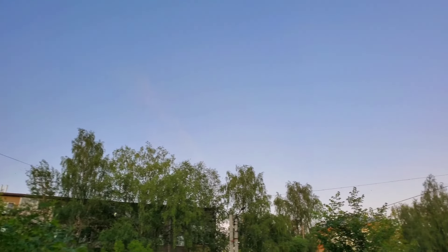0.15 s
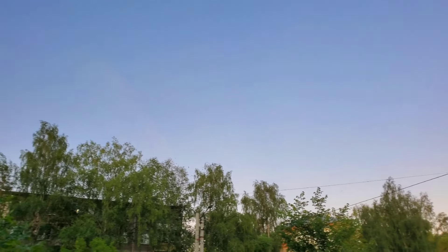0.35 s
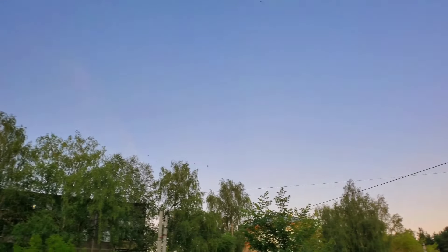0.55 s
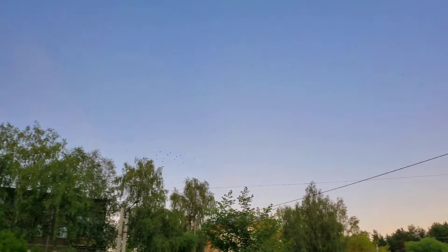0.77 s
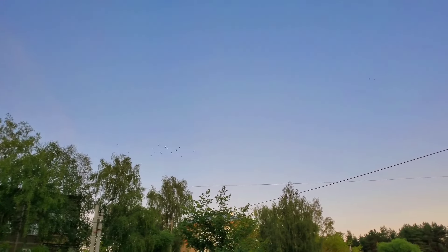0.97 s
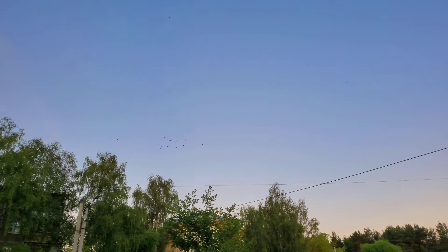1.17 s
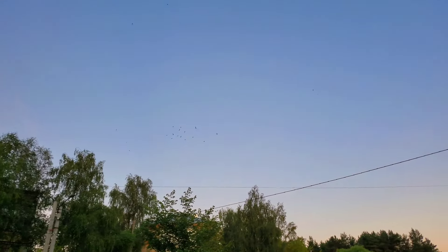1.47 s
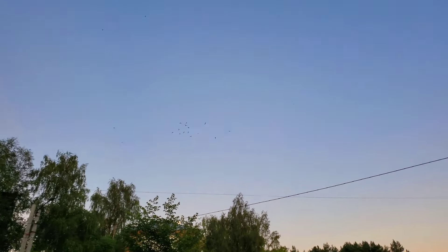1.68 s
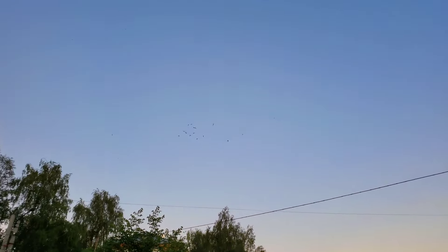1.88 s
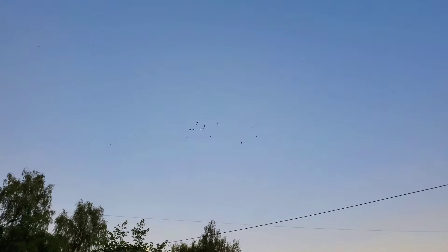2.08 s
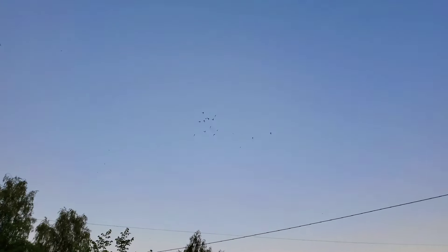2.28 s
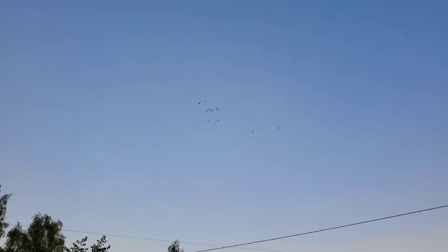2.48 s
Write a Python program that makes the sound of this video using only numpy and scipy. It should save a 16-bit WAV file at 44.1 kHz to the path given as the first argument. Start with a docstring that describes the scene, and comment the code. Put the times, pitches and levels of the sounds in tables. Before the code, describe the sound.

A flock of swifts gives high, buzzing screams outdoors above a low, distant rumble.

```python
"""Swifts scream high over trees and houses on a calm evening.
Each scream swoops up to a shrill arch, buzzing fast; most break into a slow stutter as they sink.
The shrill note is the voice's second harmonic. Trees and walls scatter the calls.
Behind them: the far flock's shimmer, distant traffic rumble, engine hums, light wind, a high hiss."""
import sys
import numpy as np
from scipy import signal
from scipy.fft import rfft, irfft, next_fast_len
from scipy.io import wavfile

SR = 44100
rng = np.random.default_rng(int(sys.argv[2]) if len(sys.argv) > 2 else 0)


def file_out(sig):
    """Save sig as 16-bit WAV at sys.argv[1]."""
    # one column per channel
    cols = np.atleast_2d(sig).T
    # limit, then scale
    lim = np.clip(cols, -1, 1)
    pcm = np.round(lim * 32767).astype(np.int16)
    wavfile.write(sys.argv[1], SR, pcm)


N = 116424
T = np.arange(N) / SR

# Near screams: start_s, length_s, top_hz, swoop_hz, crest_s, arch_hz_per_s2, level_db,
# overtones_db, stutter_s, stutter_hz, left_minus_right_db (crest_s, stutter_s count from start_s)
SCREAMS = [ (-.15, 0.33, 6100, 510, 0.22, 14000, -51.5, -17, 0.52, 67, 10),
           (-.1, 0.4, 4690, 302, 0.12, 5980, -50, -12, 0.2, 57, 1),
           (0.187, 0.56, 6230, 241, 0.26, 21200, -40.5, -10, 0.19, 71, -2.5),
           (.2, 0.12, 5915, 153, .07, 24900, -40, -19, .11, 70, 2),
           (0.222, 0.39, 5220, 200, .28, 7000, -39.5, -3.5, 0.257, 36.4, -1.5),
           (0.608, 0.18, 5900, 510.5, 0.097, 34200, -43, -12, .12, 27.5, -0.5),
           (0.741, 0.14, 5684, 47, 0.088, 8000, -46.5, -7, .1, 59, 1),
           (0.788, 0.21, 5180, 150, 0.13, 15000, -51.5, -9, 0.23, 30, 6),
           (0.934, 0.325, 6137, 702, 0.15, 14940, -33.5, -1, 0.24, 72, -2.5),
           (0.931, 0.2, 5860, 704, 0.17, 22670, -37, -19, 0.11, 58, -2),
           (1.289, 0.26, 5882, 599, 0.16, 19980, -36, -3.5, 0.19, 32, -2),
           (1.357, 0.65, 6935, 733, 0.22, 11130, -30, -0.5, 0.25, 50, 1),
           (1.611, 0.41, 6138, 956, 0.15, 12500, -33, 1.5, .217, 76, 0),
           (1.912, 0.25, 6090, 557, 0.12, 36070, -30.5, -5.5, 0.166, 31.7, -3),
           (2.218, 0.39, 6045, 907.5, 0.15, 16120, -33, -10.5, .25, 49, 1.5),
           (2.37, 0.089, 5900, 0, 0, 42300, -34, -3, .1, 50, 1),
           (2.25, 0.31, 6030, 697, 0.14, 15010, -30.5, 0.5, 0.3, 66, -2.5),
           (2.546, .33, 6050, 853, 0.15, 16170, -24.5, -11.5, .25, 55, 1)]
# Voice harmonics 3, 4, 5: relative_db
OVERTONES_DB = [-20.5, -18, -33]
# Single pulses jumping out of the stutter: time_s, pitch_hz, level_db
CHIPS = [(.505, 5450, -38), (.56, 5950, -39), (.565, 4560, -38.5), (1.139, 6910, -35), (1.157, 6840, -36),
         (1.18, 6800, -38), (1.206, 5930, -31), (1.22, 5870, -34), (1.25, 4770, -42), (1.505, 5680, -34),
         (1.54, 5710, -38), (1.573, 4260, -47), (1.75, 6560, -28), (1.775, 6710, -30), (1.801, 6600, -27),
         (1.895, 4980, -43), (2.113, 5850, -36), (2.18, 4410, -42.5)]
# Far flock envelope: time_s, level_db
FLOCK_LEVEL = [(0, -40.5), (.2, -44.5), (.45, -37), (.68, -41.5), (.9, -56.5), (1.1, -33.5), (1.3, -42.5),
               (1.75, -39.5), (2.05, -39), (2.2, -53), (2.4, -39.5), (2.64, -40)]
# Far flock spectrum: freq_hz, gain_db
FLOCK_SPECTRUM = [(3500, -23.5), (4500, -14), (5200, -2), (5900, 11), (6400, 1.5), (7100, -22), (9000, -18),
                  (11800, -15.5), (13500, -58)]
# Traffic envelope: time_s, level_db
RUMBLE_LEVEL = [(0, -31.5), (.3, -34), (.5, -32.5), (.9, -34.5), (1.1, -33.5), (1.55, -33), (1.75, -31),
                (1.95, -34), (2.35, -34), (2.64, -34.5)]
# Traffic spectrum: freq_hz, gain_db
RUMBLE_SPECTRUM = [(15, -13), (25, -41), (36, -10), (50, 4), (65, -6), (90, 1), (125, -3.5), (160, -10.5),
                   (210, -14), (280, -19.5), (400, -20.5), (520, -24.5), (700, -22.5), (1000, -33),
                   (1600, -67)]
# Distant engines: start_s, length_s, pitch_hz, level_db
HUMS = [(-0.19, 1.6, 91.5, -38.5), (1.236, 0.69, 95, -36.5), (1.573, 1.08, 80.7, -33),
        (0.467, 0.76, 367, -51.5), (1.283, 0.63, 239, -47.5), (-.2, 1.28, 655, -59.5),
        (0.97, 1.9, 653, -54.5)]
# Breeze envelope: time_s, level_db
BREEZE_LEVEL = [(0.0, -52), (0.41, -55), (0.53, -48), (0.88, -54.5), (1.27, -55.5), (1.68, -47),
                (2.21, -56), (2.31, -52), (2.64, -54.5)]
# Breeze spectrum: freq_hz, gain_db
BREEZE_SPECTRUM = [(300, -18.5), (700, -2), (1050, -3.5), (1500, 1.5), (2100, -6.5), (3000, -9.5),
                   (3800, -16), (6000, -22), (9000, -55)]
# Hiss spectrum: freq_hz, gain_db
HISS_SPECTRUM = [(3000, -63), (6000, -22), (7300, -7.5), (8400, 3.5), (10500, -7), (12000, -19),
                 (13500, -10), (15400, -22)]
# Left-right likeness of the noise beds: freq_hz, correlation
STEREO_CORRELATION = [(60, 0.93), (130, 0.93), (280, 0.87), (600, 0.32), (1300, -0.28), (2600, 0.095),
                      (9000, -0.58)]
# Left microphone response: freq_hz, gain_db
LEFT_MIC = [(60, -1.5), (400, -1.5), (1500, 0), (4000, -2), (7000, -3), (7450, 0.5), (8000, 3.5), (9000, 3),
            (12000, 4.5), (13000, 1.5), (15000, -8.5)]
# Right microphone response: freq_hz, gain_db
RIGHT_MIC = [(60, -0.5), (400, 3.5), (1500, 2.5), (4000, 0), (7000, -2.5), (7450, 3), (7900, -22),
             (8700, -12.5), (12000, -5), (13000, -11), (15000, -17)]

ATTACK_S, RELEASE_S, FADE_DB_PER_S = 0.0056, 0.032, 80
SWOOP_S, SWOOP_QUIET_DB, SWELL_S = 0.023, 13, 0.018
BUZZ_HZ, BUZZ_SLOWING_PER_S, BUZZ_DEPTH, BUZZ_SWING_HZ = 252, 1, 0.49, -27
STUTTER_SWING_HZ, JITTER_HZ, WAVER_HZ, FLUTTER_DB = 48, 21.5, 31.9, 1
RASP_DB, RASP_WIDTH_HZ, RASP_BELOW_HZ = -15.5, 700, 150
OVERTONE_RASP_DB, OVERTONE_FLUTTER_DB, THIRD_FADE_DB_PER_S = -4.5, 1.85, 58


def amp(db):
    """Decibels to gain."""
    return 10 ** (np.asarray(db) / 20)


def unit_rms(x):
    """Scale to rms 1."""
    return x / np.sqrt(np.mean(np.abs(x) ** 2) + 1e-20)


def log_interp(rows, hz):
    """Interpolate (freq_hz, value) rows on a log axis."""
    freq_hz, values = np.transpose(rows)
    return np.interp(np.log(hz + 1), np.log(freq_hz + 1), values)


def gain_curve(rows):
    """Gain per sample from (time_s, level_db) rows."""
    return amp(np.interp(T, *np.transpose(rows)))


def ramp(u):
    """Smooth step from 0 to 1."""
    return np.sin(np.pi / 2 * np.clip(u, 0, 1)) ** 2


def wobble(knots_per_s, t):
    """Smooth random curve, rms about 1."""
    curve = signal.resample_poly(rng.standard_normal(1024), 4, 1)
    return np.interp(t * knots_per_s * 4, np.arange(len(curve)), curve)


def phase_rad(hz):
    """Running phase of a frequency curve, random start."""
    return 2 * np.pi * (np.cumsum(hz) / SR + rng.random())


def filtered(x, response):
    """Apply a frequency response by FFT."""
    size = next_fast_len(N + SR // 2)
    return irfft(rfft(x, size) * response(np.fft.rfftfreq(size, 1 / SR)), size)[..., :N]


def stereo_noise(spectrum):
    """Shaped noise of rms 1, nearly mono in the bass."""
    def mid_side_gains(hz):
        angle = np.arccos(np.clip(log_interp(STEREO_CORRELATION, hz), -1, 1)) / 2
        return amp(log_interp(spectrum, hz)) * [np.cos(angle), np.sin(angle)]
    mid, side = filtered(rng.standard_normal((2, N)), mid_side_gains)
    return unit_rms(np.array([mid + side, mid - side]))


def add(out, start_s, sound):
    """Mix a stereo sound in at start_s."""
    at = round(start_s * SR)
    part = sound[:, max(-at, 0):N - at]
    out[:, max(at, 0):][:, :part.shape[1]] += part


def scream(t, length_s, top_hz, swoop_hz, crest_s, arch_hz_per_s2, overtones_db, stutter_s, stutter_hz):
    """Arched whistle with a rasp just under it, chopped by a fast buzz, then a fading stutter."""
    buzz_hz = BUZZ_HZ * np.exp(-BUZZ_SLOWING_PER_S * t) * (1 + 0.0775 * wobble(60.6, t))
    buzz = np.sin(phase_rad(buzz_hz))
    into_stutter_s = t - stutter_s
    stutter = np.cos(2 * np.pi * stutter_hz * into_stutter_s + 0.068 * wobble(31, t))
    stutter *= ramp(into_stutter_s / 0.011 + 0.5)
    pitch_hz = top_hz - swoop_hz * np.exp(-t / SWOOP_S) - arch_hz_per_s2 * (t - crest_s) ** 2
    pitch_hz += BUZZ_SWING_HZ * buzz + STUTTER_SWING_HZ * stutter
    pitch_hz += JITTER_HZ * wobble(900, t) + WAVER_HZ * wobble(29, t)
    fundamental_rad = phase_rad(pitch_hz / 2)
    rasp = amp(RASP_DB) * roughness(t) * np.exp(-2j * np.pi * RASP_BELOW_HZ * t)
    whistle = np.real((1 + rasp) * np.exp(2j * fundamental_rad)) * amp(FLUTTER_DB * wobble(21.6, t))
    pulse = 1 + BUZZ_DEPTH * buzz
    voice = pulse * whistle + amp(overtones_db) * pulse ** 2 * overtones(fundamental_rad, t)
    gate = ramp(t / ATTACK_S) * ramp((length_s - t) / RELEASE_S)
    swell_db = -SWOOP_QUIET_DB * np.exp(-t / SWELL_S)
    fade_db = -FADE_DB_PER_S * np.maximum(into_stutter_s, 0)
    return voice * gate * amp(swell_db + fade_db) * (1 + stutter)


def roughness(t):
    """Complex narrowband noise that spreads a harmonic into a rasp."""
    return wobble(RASP_WIDTH_HZ, t) + 1j * wobble(RASP_WIDTH_HZ, t)


def overtones(fundamental_rad, t):
    """Rough, flickering harmonics above the shrill note; the third flares at the onset."""
    out = 0
    for harmonic, db in enumerate(OVERTONES_DB, 3):
        fade_db = -THIRD_FADE_DB_PER_S * t if harmonic == 3 else 0
        gain = amp(db + fade_db + OVERTONE_FLUTTER_DB * wobble(36.4, t))
        rough = 1 + amp(OVERTONE_RASP_DB) * roughness(t)
        out += gain * np.real(rough * np.exp(1j * harmonic * fundamental_rad))
    return out


def chip(t, pitch_hz, half_width_s=0.0045, jitter_hz=112, overtones_db=3.5):
    """One Gaussian pulse of the voice, centred on t = 0."""
    age_s = t - t[0]
    fundamental_rad = phase_rad((pitch_hz + jitter_hz * wobble(722, age_s)) / 2)
    voice = np.sin(2 * fundamental_rad) + amp(overtones_db) * overtones(fundamental_rad, age_s)
    return np.exp(-(t / half_width_s) ** 2) * voice


def outdoors(call, t60_s=0.39, scatter_db=-4.5, reflections=8, reflections_db=-6):
    """Direct sound, ground and wall reflections, and scatter from the trees."""
    t = T[:SR // 2]
    scatter = rng.standard_normal((2, len(t))) * amp(-60 * t / t60_s) * ramp(t / 0.0045)
    impulse = amp(scatter_db) * unit_rms(scatter) / np.sqrt(len(t))
    impulse[:, 0] += 1
    for channel in impulse:
        taps = (SR * rng.uniform(0.0005, 0.02, reflections)).astype(int)
        strengths = unit_rms(rng.standard_normal(reflections)) / np.sqrt(reflections)
        channel[taps] += amp(reflections_db) * strengths
    return signal.fftconvolve(call[None], impulse, axes=1)[:, :N]


def near_swifts(mic_lag_s=0.00004):
    """Screams and chips, reaching the right microphone first."""
    out = np.zeros((2, N))
    for start_s, length_s, *contour, db, overtones_db, stutter_s, stutter_hz, pan_db in SCREAMS:
        call = scream(T[T < length_s], length_s, *contour, overtones_db, stutter_s, stutter_hz)
        pan = amp([[pan_db / 2], [-pan_db / 2]])
        add(out, start_s, amp(db) * pan * outdoors(call))
    t = np.arange(-0.015, 0.015, 1 / SR)
    for time_s, pitch_hz, db in CHIPS:
        add(out, time_s + t[0], amp(db) * outdoors(chip(t, pitch_hz)))
    delay_s = np.array([[mic_lag_s / 2], [-mic_lag_s / 2]])
    return filtered(out, lambda hz: np.exp(-2j * np.pi * hz * delay_s))


def far_flock(shimmer_db=2.6):
    """The rest of the flock, blurred by distance into a shrill shimmer."""
    shimmer = amp(shimmer_db * wobble(120, T))
    return gain_curve(FLOCK_LEVEL) * shimmer * stereo_noise(FLOCK_SPECTRUM)


def engine_hums(fade_s=0.11, drift_ratio=0.00614):
    """Distant engines: sines drifting in level and pitch."""
    out = np.zeros(N)
    for start_s, length_s, pitch_hz, db in HUMS:
        peak = np.sqrt(2) * amp(db + wobble(6.14, T))
        tone = np.sin(phase_rad(pitch_hz * (1 + drift_ratio * wobble(8, T))))
        gate = ramp((T - start_s) / fade_s) * ramp((start_s + length_s - T) / fade_s)
        out += peak * tone * gate
    return out


def traffic_rumble():
    """Low noise of far traffic."""
    return gain_curve(RUMBLE_LEVEL) * stereo_noise(RUMBLE_SPECTRUM)


def breeze(boost_db=4.5):
    """Light wind swelling in the trees."""
    return amp(boost_db) * gain_curve(BREEZE_LEVEL) * stereo_noise(BREEZE_SPECTRUM)


def hiss(level_db=-58):
    """Steady high hiss."""
    return amp(level_db) * stereo_noise(HISS_SPECTRUM)


def scene():
    """Birds above, traffic and breeze below."""
    return near_swifts() + far_flock() + engine_hums() + traffic_rumble() + breeze() + hiss()


def record(dry, cutoff_hz=15400):
    """Two band-limited microphones, the right one duller."""
    def response(hz):
        return amp([log_interp(LEFT_MIC, hz), log_interp(RIGHT_MIC, hz)]) * (hz < cutoff_hz)
    return filtered(dry, response)


dry = scene()
out = record(dry)
file_out(out)
```